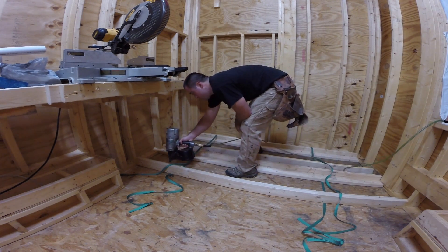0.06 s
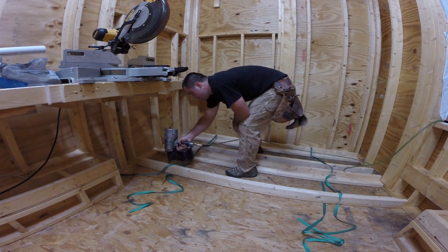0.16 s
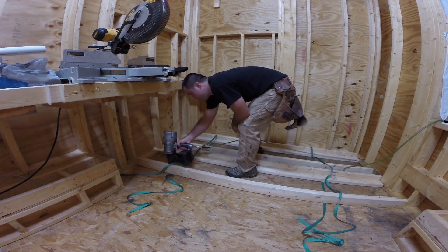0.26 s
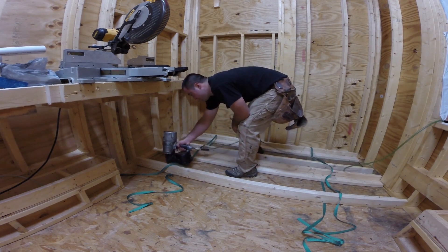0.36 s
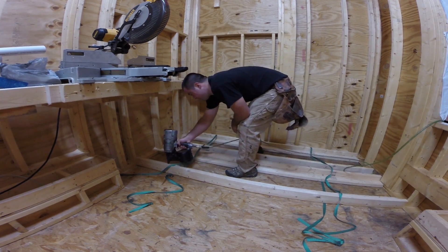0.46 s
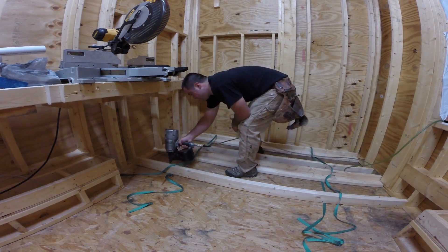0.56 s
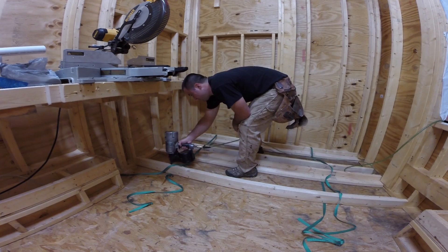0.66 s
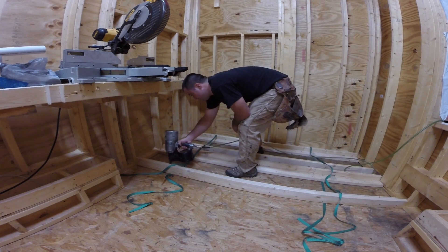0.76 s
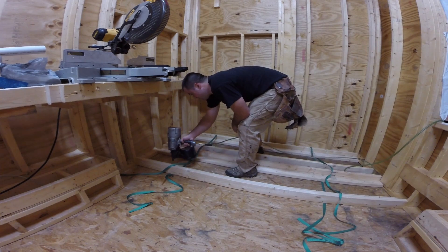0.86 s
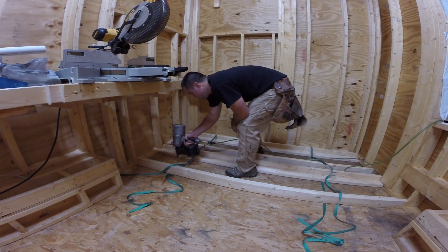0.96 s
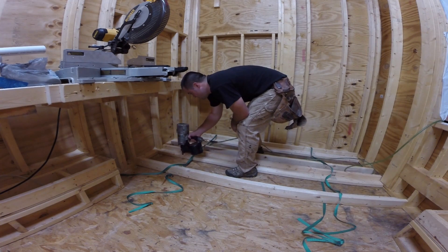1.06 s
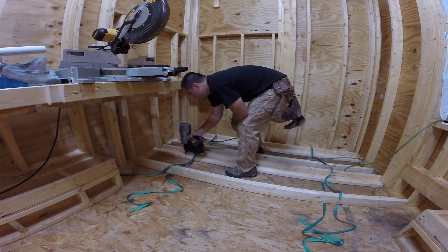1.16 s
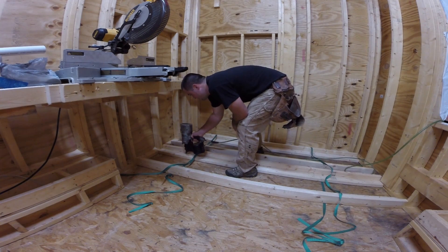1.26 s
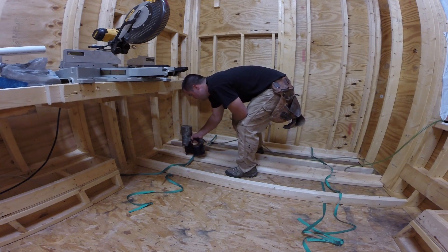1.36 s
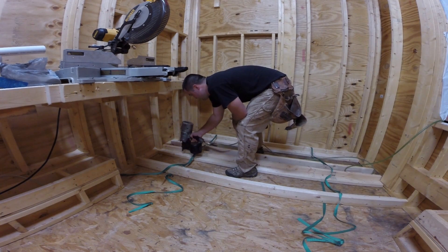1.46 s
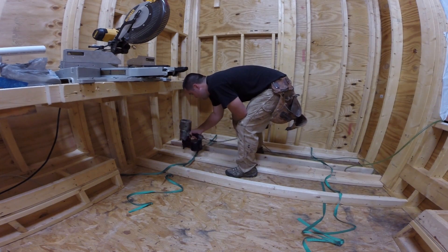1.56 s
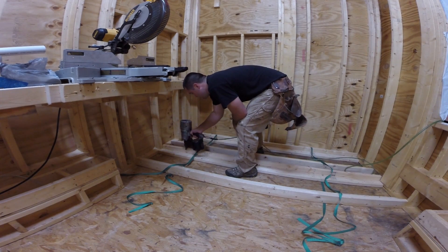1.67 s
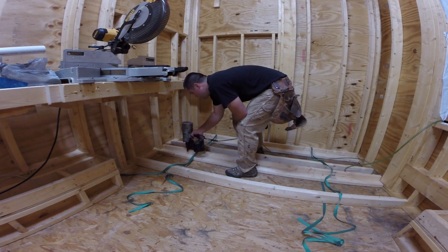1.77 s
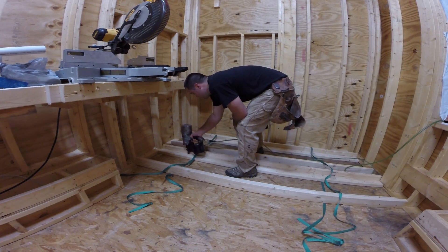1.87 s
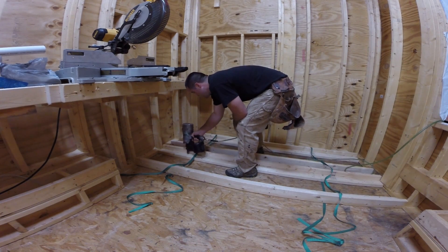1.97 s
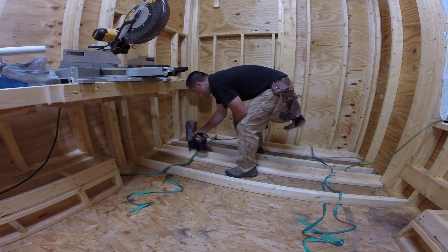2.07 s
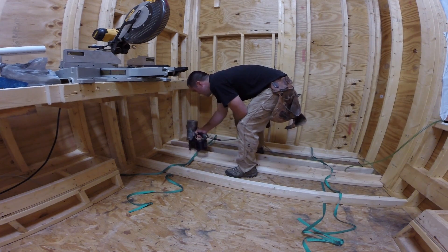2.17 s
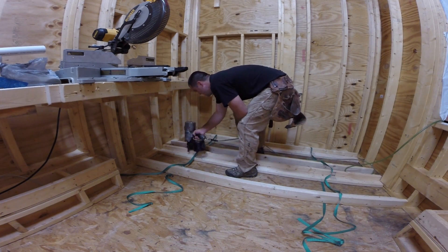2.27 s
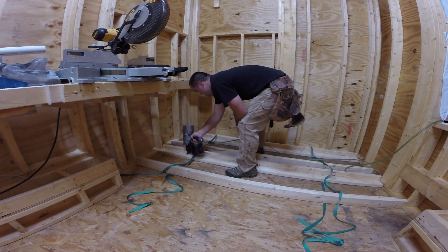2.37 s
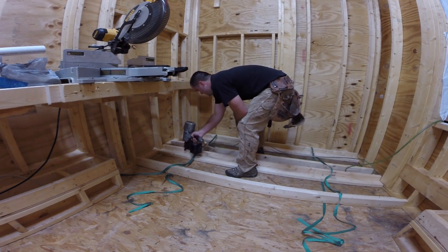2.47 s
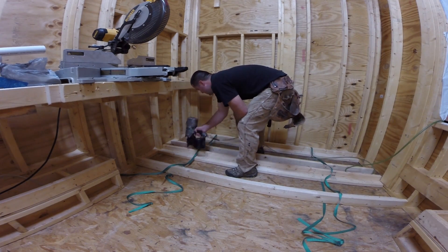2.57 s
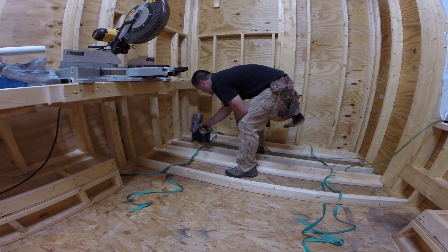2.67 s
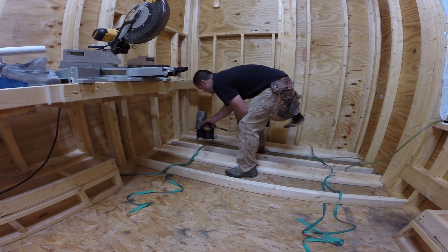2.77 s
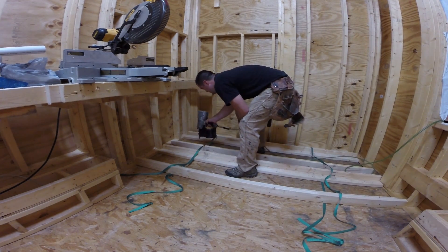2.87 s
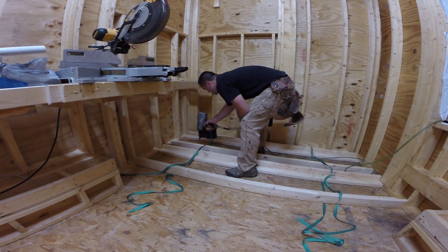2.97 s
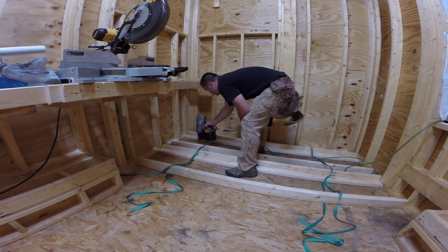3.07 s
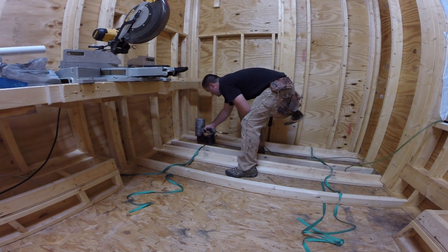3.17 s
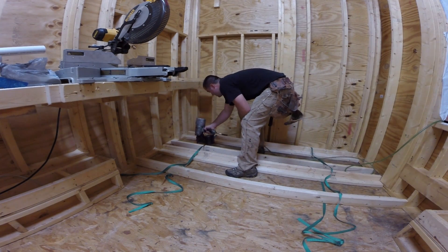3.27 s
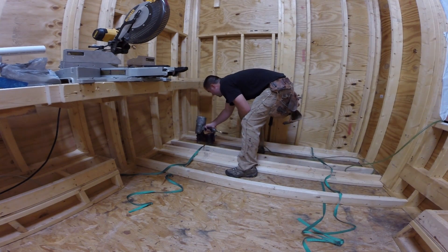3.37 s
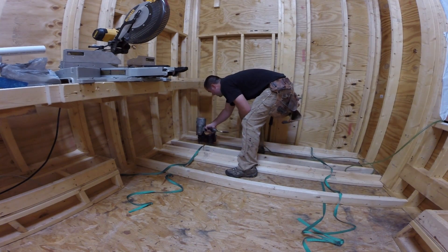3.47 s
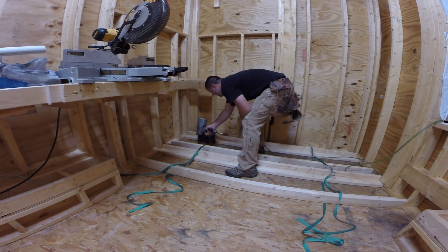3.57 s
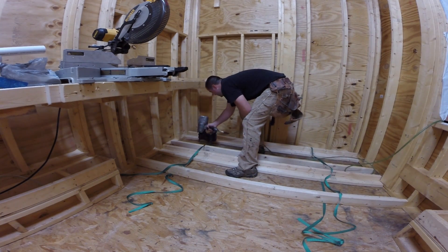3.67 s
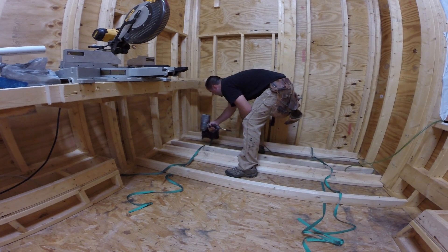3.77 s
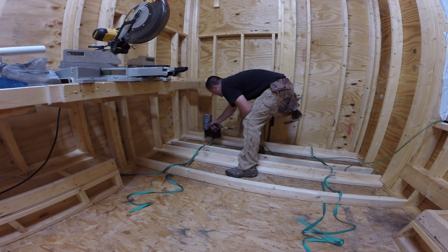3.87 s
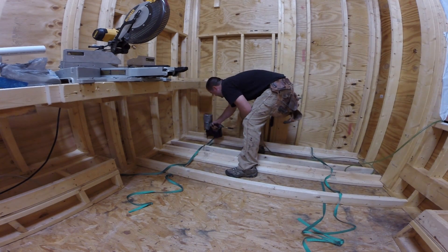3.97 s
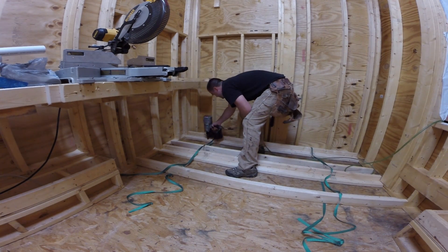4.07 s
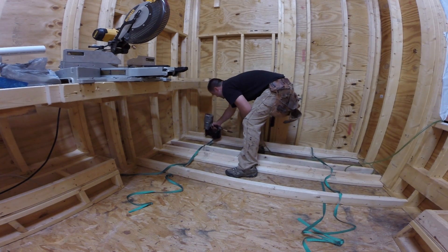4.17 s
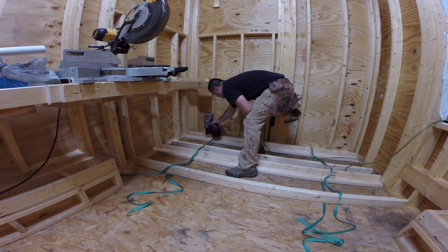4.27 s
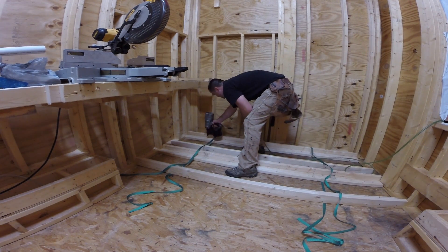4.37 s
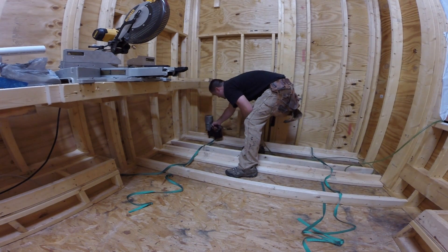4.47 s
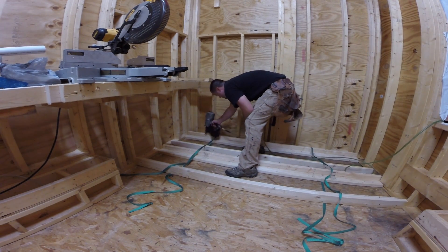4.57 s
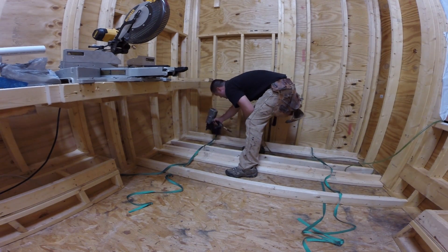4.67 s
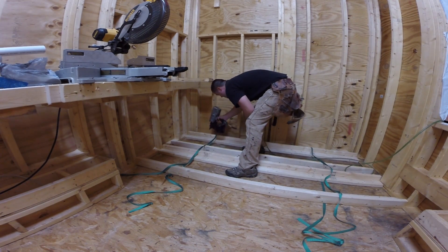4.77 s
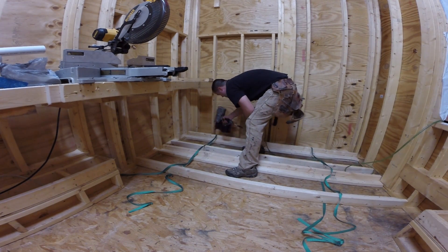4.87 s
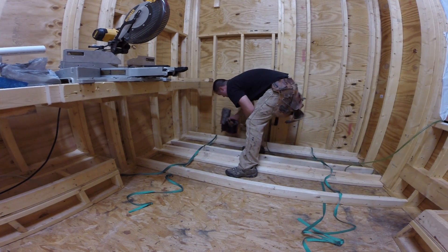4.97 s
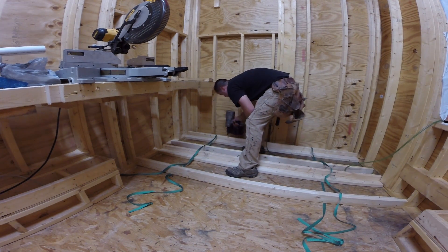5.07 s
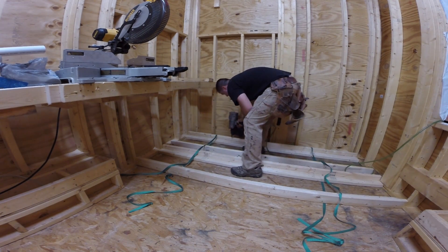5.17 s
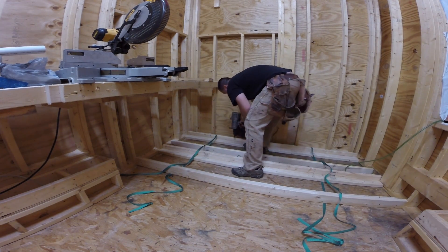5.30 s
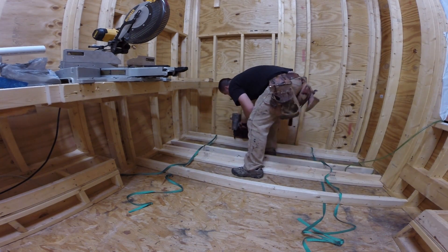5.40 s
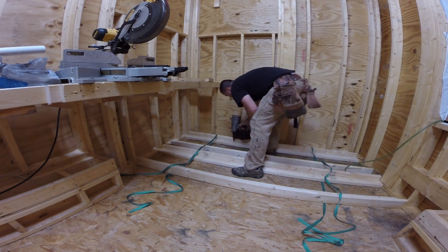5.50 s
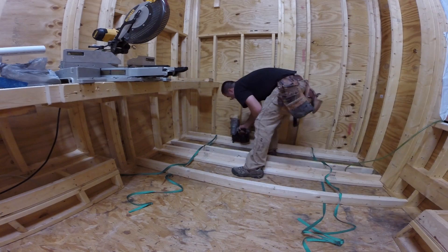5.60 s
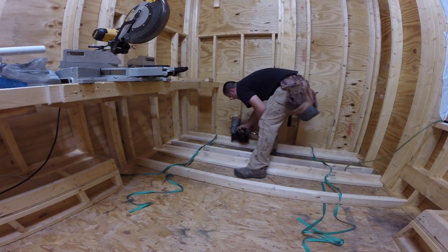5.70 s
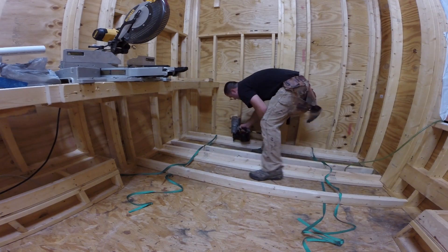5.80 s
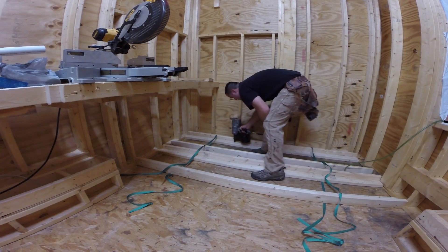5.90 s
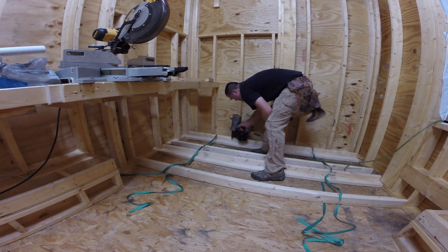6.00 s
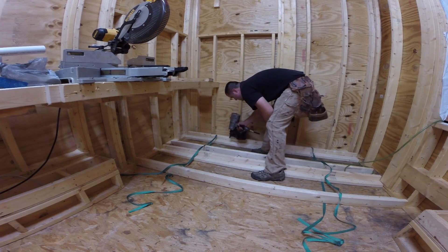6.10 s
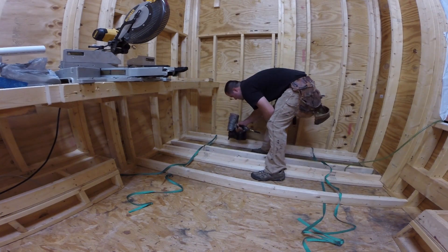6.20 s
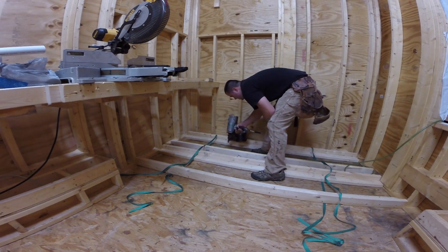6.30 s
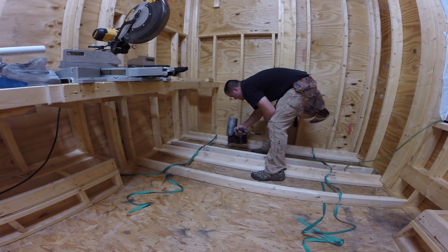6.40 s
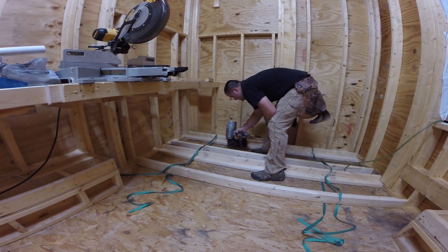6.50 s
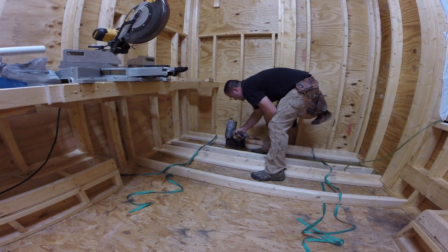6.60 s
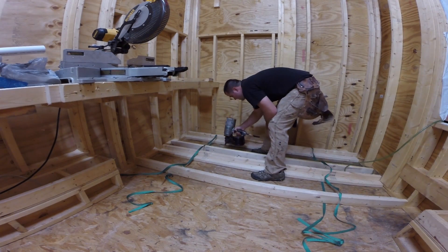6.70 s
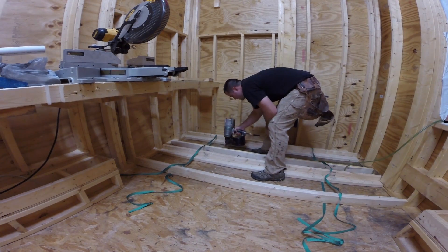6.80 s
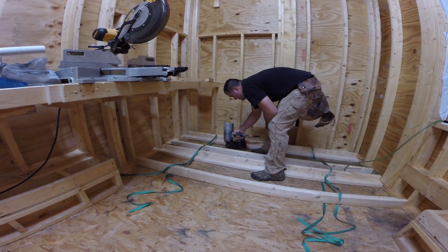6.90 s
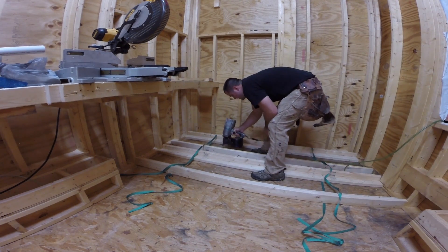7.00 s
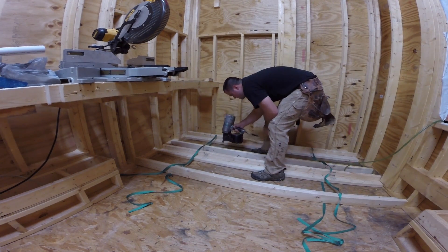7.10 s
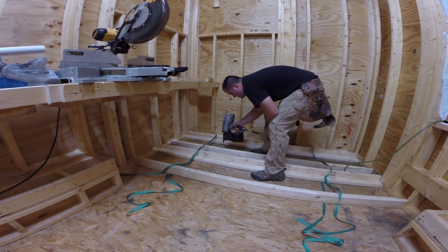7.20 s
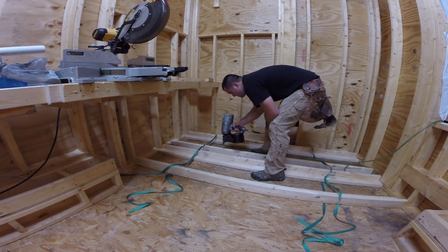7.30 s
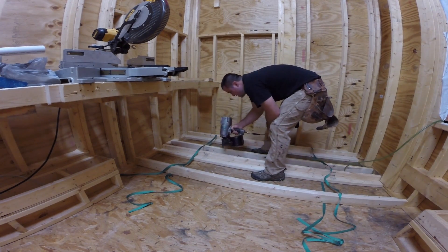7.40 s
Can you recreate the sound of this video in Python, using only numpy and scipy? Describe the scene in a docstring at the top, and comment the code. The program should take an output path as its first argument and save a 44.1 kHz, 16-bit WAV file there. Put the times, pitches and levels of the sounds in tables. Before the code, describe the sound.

A small bare plywood room, one microphone across it, faint low room noise. A rush of air dies away in the first 0.2 s, with a light bump at 0.14. A pneumatic nailer then fires at about 0.4 and 0.8, alone at 1.5 and 2.5, then in pairs at 3.3 and 3.6, 4.2 and 4.55, 5.7 and 6.0, 6.6 and 7.0. Each shot is a tick and swelling air, a loud woody slam, an exhaust puff, a piston knock some 0.06 s later, and a wavering hiss under half a second, while the floor booms low. Around 1.9-2.2 the gun clatters onto lumber with a deep thud and tiny nail clink; fainter bumps, a clink and a scuff come near 2.9. Soft bump and boot scuffs at 5.1-5.5. Later the hiss shortens and loses its whistle, the air turns brighter, and piston knocks soften.

```python
"""The floor of a small plywood room, heard by one microphone across the room: a pneumatic framing nailer drives
twelve nails, mostly in pairs, into a timber frame. Each shot: the trigger valve ticks, air fills the cylinder, the
driver slams the nail home, the exhaust puffs, the piston knocks back and the hose hisses as it refills the tool.
The floor booms as decaying sines, the gun bumps the lumber, a boot scuffs. The blows and puffs are shaped noise,
most of it passed through the room's decay; a limiter holds the peaks."""
import sys
import numpy as np
from scipy import signal
from scipy.fft import rfft, irfft, next_fast_len
from scipy.io import wavfile
from scipy.ndimage import uniform_filter1d, minimum_filter1d

SR = 44100
rng = np.random.default_rng(int(sys.argv[2]) if len(sys.argv) > 2 else 0)


def unload_wav(signal):
    """Save mono or channel-first audio to the path in sys.argv[1] as 16-bit WAV at rate SR, clipped to [-1, 1]."""
    wavfile.write(
        sys.argv[1],
        SR,
        np.round(np.clip(np.atleast_2d(signal).T, -1, 1) * 32767).astype(np.int16),
    )


N = 328545  # length in samples
T = np.arange(SR) / SR  # time within one event, s


# shots: t/s, trigger lead/s, tick level/dB, blow level/dB, board ring f/Hz, boom level/dB, piston return delay/s
# (tick, blow and boom levels are set per shot; the other parts have their own levels below)
SHOTS = [(0.399, 0.025, -37, -21.5, 1207, -33.5, 0.062), (0.778, 0.024, -27.5, -19, 752, -34, 0.068),
         (1.465, 0.027, -37.5, -20, 1284, -32, 0.059), (2.462, 0.026, -37, -19.5, 1298, -33.5, 0.062),
         (3.3, 0.025, -35.5, -20, 762, -37.5, 0.065), (3.609, 0.019, -34, -18.5, 740, -36, 0.061),
         (4.18, 0.027, -32, -20.5, 927, -35, 0.058), (4.554, 0.021, -38.5, -21.5, 606, -33.5, 0.051),
         (5.698, 0.025, -37, -21.5, 1256, -37.5, 0.06), (5.994, 0.02, -34, -24, 632, -35.5, 0.056),
         (6.634, 0.027, -34.5, -21, 846, -32.5, 0.058), (7.004, 0.02, -31, -27, 1397, -32.5, 0.061)]
# the worker swings the gun round along the frame: t/s, turn (0 side on, 1 exhaust port toward the microphone)
TURN = [(.4, 0.0098), (.78, -0.088), (1.46, 0.19), (2.46, 0.023), (3.3, -0.08), (4.18, 0.017), (4.55, 0.57),
        (5.7, .95), (7, 1.3)]


def nailer():
    """The firing cycle of each shot, from trigger to refill."""
    out = np.zeros(N)
    for s, lead, tick_db, blow_db, board_hz, boom_db, back in SHOTS:
        turn = np.interp(s, *np.transpose(TURN))
        beam = exhaust_beam(turn)
        trigger(out, s - lead, tick_db)
        fill(out, s, lead)
        drive_nail(out, s, blow_db, board_hz)
        thump(out, s, turn)
        floor_boom(out, s, boom_db)
        exhaust(out, s, turn, beam)
        piston_return(out, s, back)
        hose(out, s, turn, beam)
    return out


# spectrum of the trigger valve: f/Hz, level/dB per Hz
VALVE = [(30, -18.5), (200, -15), (600, -5), (950, -2.5), (1300, -6), (2100, -18.5), (3200, -17),
         (8000, -32.5), (15000, -42.5)]
# the gun's body under the trigger valve: f/Hz, width/Hz, lift/dB
VALVE_RING = [(980, 200, 6)]


def trigger(out, s, tick_db):
    """The trigger valve ticks: brief noise and a short ring of the gun's body."""
    tick = strike(0.0003, 0.0084)
    add(out, s, amp(tick_db) * in_room(noise(VALVE, SR, VALVE_RING), tick, direct=1.3))
    ring = strike(0.00064, 0.0045) * sine(rng.normal(980, 40))
    add(out, s, amp(tick_db + 3.5) * ring)


# spectrum of the air entering the cylinder: f/Hz, level/dB per Hz
FILL = [(40, -12.5), (400, -10), (720, -6), (980, -6), (1250, -14.5), (1900, -18), (2400, -12),
        (2900, -20.5), (5000, -25.5), (9000, -29.5), (15000, -45)]
# a trigger pulled faster than usual fills the cylinder harder
FILL_DB, USUAL_LEAD_S, FILL_DB_PER_S = -28, 0.026, 554


def fill(out, s, lead):
    """The head valve lets air into the cylinder, swelling toward the blow."""
    level_db = FILL_DB + FILL_DB_PER_S * (USUAL_LEAD_S - lead)
    air = noise(FILL, SR, ripple_db=5.0)
    add(out, s - 0.012, amp(level_db) * in_room(air, strike(0.0046, 0.011), direct=0.61, fade=0.65))


# spectrum of the nail blow: f/Hz, level/dB per Hz
BLOW = [(25, -23), (90, -13), (240, -17), (420, -5), (700, 0.5), (1000, 0), (1400, -1), (2200, -12.5),
        (3400, -15), (5000, -21), (9000, -29), (15000, -47.5)]
# resonances of the gun's housing and magazine: f/Hz, width/Hz, lift/dB (negative dips)
HOUSING = [(523, 72, 3), (825, 18, 3), (1344, 34, 2.5), (1840, 210, 1.5), (3164, 60, 3), (3430, 90, 3.5),
           (4370, 68, 7), (5020, 12, -2.5), (5589, 40, 1), (6300, 58, 4.5), (6800, 80, 4.5), (8100, 66, 1)]


def drive_nail(out, s, blow_db, board_hz):
    """The driver slams the nail into the board, a noise burst, and the board rings briefly."""
    wood = noise(BLOW, SR, HOUSING + [(board_hz, 100, 5)], ripple_db=2.5)
    slam = in_room(wood, strike(0.012, 0.011) ** 2, direct=0.76, fade=0.95)
    add(out, s - 0.003, amp(blow_db + 4.0) * slam)
    add(out, s + 0.002, amp(blow_db + 1.0) * strike(0.006, 0.008) * sine(board_hz))


# spectrum of the shaken frame: f/Hz, level/dB per Hz
THUMP = [(70, -13.5), (130, -1), (200, -3.5), (260, -3.5), (335, 0), (420, -4), (600, -21.5), (2000, -60.5)]
THUMP_DB, TURN_THUMP_DB = -28, 3  # gun side on; the frame thumps more where the worker ends up


def thump(out, s, turn):
    """The blow shakes the frame, a short low noise."""
    frame = noise(THUMP, SR, ripple_db=4.5)
    level_db = THUMP_DB + TURN_THUMP_DB * turn
    add(out, s, amp(level_db) * in_room(frame, strike(0.0031, 0.0089), direct=0.76))


# nominal modes of the plywood floor: f/Hz, level/dB, t60/s
FLOOR = [(44, -4.5, 0.93), (56.5, -10, 0.5), (65.13, -1.5, 0.84), (82.37, -3.5, 0.82), (109.4, -10, 0.85),
         (143.7, -7, 0.73), (152.7, -3, 0.61), (218.4, -0.5, 0.51), (330, 5.5, 0.3)]
# the joist under the gun rings lower once the work has moved on
NEAR_JOIST_HZ, FAR_JOIST_HZ, NEXT_JOIST_S = 79.16, 59.23, 4.37


def floor_boom(out, s, boom_db):
    """The floor's modes swell after a blow and decay as sines; the joist under the gun rings with them."""
    joist_hz = NEAR_JOIST_HZ if s < NEXT_JOIST_S else FAR_JOIST_HZ
    ring = np.zeros(SR)
    for hz, db, t60 in FLOOR + [(joist_hz, 2.5, 0.8)]:
        decay = amp(db + rng.normal(0, 1.5) - 60 * T / t60)
        cycles = hz * rng.normal(1, 0.011) * T + rng.random()
        ring += decay * np.sin(2 * np.pi * cycles)
    swell = 1 - np.exp(-(T / 0.036) ** 2)
    add(out, s, amp(boom_db + 4.5) * ring * swell)


# spectrum of the exhaust air: f/Hz, level/dB per Hz
EXHAUST = [(100, -11.5), (600, 4), (1350, -13.5), (2100, -3.5), (3300, 2), (4500, -3.5), (7000, -6),
           (9500, -9.5), (12500, -18), (15000, -33)]
EXHAUST_DB, TURN_EXHAUST_DB = -23.5, -4.5  # gun side on; a full turn shades the puff's body
SIDE_TREBLE_DB, TURN_TREBLE_DB = -0.6, 5.5  # a full turn beams the air's treble at the microphone


def exhaust_beam(turn):
    """Treble lift of the escaping air, one broad peak that grows as the port faces the microphone."""
    return [(11000, 8900, SIDE_TREBLE_DB + TURN_TREBLE_DB * turn)]


def exhaust(out, s, turn, beam):
    """Air leaks during the stroke, then the exhaust port opens and puffs."""
    leak = 0.26 * strike(0.004, 0.016)
    puff = np.exp(-((T - 0.033) / 0.011) ** 2)
    air = noise(EXHAUST, SR, HOUSING + beam, ripple_db=2.5)
    level_db = EXHAUST_DB + TURN_EXHAUST_DB * turn
    add(out, s, amp(level_db) * in_room(air, puff + leak, direct=0.52, fade=0.7))


# spectrum of the piston's knock: f/Hz, level/dB per Hz
RETURN = [(40, -12), (150, -6.5), (400, -8), (550, -1), (720, -0.5), (1000, -4.5), (1400, -7), (2000, -13),
          (3200, -18.5), (6000, -23.5), (15000, -47.5)]
# spectrum of metal on metal, also heard in the bumps: f/Hz, level/dB per Hz
CLACK = [(400, -27), (1200, -0.5), (3400, 2), (5000, -9), (9000, -17.5), (15000, -40)]
RETURN_DB, RETURN_SAG_DB_PER_S = -15, 1.12  # the air supply sags: the piston returns more softly
PISTON_CLACK_DB = -8.5  # steel on steel, against the piston's knock


def piston_return(out, s, back):
    """The piston knocks back against its stop: a knock, a clack and a short ring."""
    level_db = RETURN_DB - RETURN_SAG_DB_PER_S * s
    knock = noise(RETURN, SR, HOUSING, ripple_db=3.0)
    clack = amp(PISTON_CLACK_DB) * noise(CLACK, SR, HOUSING, ripple_db=3.0)
    add(out, s + back, amp(level_db) * in_room(knock + clack, strike(0.0036, 0.005), direct=2.56))
    ring = strike(0.003, 0.0056) * sine(rng.normal(550, 25))
    add(out, s + back + 0.002, amp(level_db + 2) * ring)


# spectrum of the hose's hiss: f/Hz, level/dB per Hz
HISS = [(500, -11.5), (2000, 2), (3500, -8.5), (5200, 1), (6300, -12.5), (7400, 0), (8400, 0), (9600, -4),
        (11600, -3), (13000, -11), (15000, -20.5)]
# spectrum of the hose's whistle: f/Hz, level/dB per Hz
WHISTLE = [(1500, -20.5), (2600, -10.5), (4100, -12), (4750, 0), (5050, -6), (5450, -3.5), (6400, -10.5),
           (7500, -13), (10000, -29)]
HISS_DB, WHISTLE_DB, TURN_WHISTLE_DB = -41, -37.5, -17  # gun side on; a full turn shades the whistle
REFILL_S, REFILL_SAG_PER_S = 0.4, 0.052  # at the start; the refill shortens by this share each second


def hose(out, s, turn, beam):
    """The hose refills the tool: the hiss wavers a little at random, weakens and stops; its resonances change."""
    refill = REFILL_S * (1 - REFILL_SAG_PER_S * s)
    opening = 1 - np.exp(-T / 0.0082)
    closing = 1 + np.exp(np.minimum((T - refill) / 0.019, 50))
    flow = opening * amp(-48 * T) / closing
    air = np.zeros(SR)
    position = np.minimum(3 * T / refill, 3)
    for stage in range(4):  # crossfade four random sets of resonances over the refill
        share = np.clip(1 - np.abs(position - stage), 0, 1)
        tones = [(hz, 300, 4.5) for hz in rng.uniform(3500, 13500, size=6)]
        hiss = amp(HISS_DB) * noise(HISS, SR, tones + beam)
        whistle = amp(WHISTLE_DB + TURN_WHISTLE_DB * turn) * noise(WHISTLE, SR, ripple_db=5.0)
        air += np.sqrt(share) * (hiss + whistle)
    waver = amp(3.3 * unit(uniform_filter1d(rng.standard_normal(SR), size=900)))
    add(out, s, in_room(air, waver * flow / flow.max(), direct=0.69))


# the gun's nose and body bump the lumber: t/s, ring level/dB, ring f/Hz, hardness (contact noise over ring)/dB
BUMPS = [(0.144, -45, 742, -23), (1.911, -33, 674, 0.5), (1.936, -37.5, 580, -2), (1.984, -41.5, 537, 0.5),
         (2.024, -39.5, 675, -7), (2.184, -48.5, 617, -7.5), (2.204, -46.5, 717, -6),
         (2.233, -58.5, 517, 7), (2.925, -54, 586, -5.5), (5.137, -55, 650, -14)]
# spectrum of the wooden knock: f/Hz, level/dB per Hz
BUMP = [(40, -17), (140, -8), (250, -15), (480, -5), (680, -1), (900, -8), (1150, -12), (1700, -17),
        (5000, -34), (15000, -60.5)]
BUMP_CLACK_DB = -5.5  # metal clack against the wooden knock


def bumps():
    """The gun is set down on the lumber: a wooden knock, a metal clack and a ring of the board."""
    out = np.zeros(N)
    for s, db, ring_hz, hard_db in BUMPS:
        knock = noise(BUMP, SR, ripple_db=3.5)
        clack = amp(BUMP_CLACK_DB) * noise(CLACK, SR, HOUSING, ripple_db=4.5)
        contact = in_room(knock + clack, strike(0.0036, 0.0066), direct=2.1)
        add(out, s - 0.002, amp(db + hard_db) * contact)
        add(out, s, amp(db) * strike(0.003, 0.014) * sine(ring_hz))
    return out


SETTLE_S, SETTLE_DB, SETTLE_HZ = 1.95, -36, 42.8


def settle():
    """The gun's weight settles on the floor with a thud, one low decaying sine."""
    out = np.zeros(N)
    add(out, SETTLE_S, amp(SETTLE_DB) * strike(0.067, 0.055) * sine(SETTLE_HZ))
    return out


# the nail strip clinks in its magazine: t/s, level/dB, ring f/Hz
CLINKS = [(2.16, -56.5, 3990), (2.895, -60.5, 3550)]


def clinks():
    """Nails clink together: a very short burst of bright noise with a broad resonance."""
    out = np.zeros(N)
    for s, db, ring_hz in CLINKS:
        spectrum = [(1500, -20.5), (4000, -1.0), (15000, -17.0)]  # f/Hz, level/dB per Hz
        steel = noise(spectrum, SR, [(ring_hz, 1400, 10)], ripple_db=4.5)
        add(out, s, amp(db) * in_room(steel, strike(0.00056, 0.006), direct=2.3))
    return out


# boot and clothes scuff over the boards: peak t/s, half length to 1/e/s, level before the grip varies it/dB, ring f/Hz
SCUFFS = [(2.953, .025, -62, 2500), (5.233, 0.084, -55.5, 1110), (5.446, .026, -52.5, 700),
          (5.48, 0.022, -49, 1900), (5.515, 0.049, -56.5, 218)]
# spectrum of a scuff: f/Hz, level/dB per Hz
SCUFF = [(40, -1), (130, -1.5), (400, -5.5), (1000, -4), (1500, -9.5), (3000, -20.5), (7000, -30.5),
         (15000, -45)]


def scuffs():
    """Soles catch and slip on the boards: noise with a randomly wavering level."""
    out = np.zeros(N)
    for s, half, db, ring_hz in SCUFFS:
        grip = amp(2.4 * unit(uniform_filter1d(rng.standard_normal(SR), size=300)))
        stroke = np.exp(-np.abs((T - 0.5) / half) ** 1.1)
        rub = noise(SCUFF, SR, [(ring_hz, ring_hz / 2, 6)], ripple_db=5.5)
        add(out, s - 0.5, amp(db) * stroke * grip * rub)
    return out


# a rush of air dies away at the start: t/s, level/dB
RUSH = [(0, -40.5), (.06, -50), (.13, -50.5), (.205, -53.5), (.218, -79.5)]


def opening_rush():
    """Air rushes at the start: broad noise that follows the falling level."""
    spectrum = [(30, 0.0), (200, -2.5), (750, -5.0), (1500, -12.0),
                (3000, -18.5), (8000, -25.0), (15000, -30)]  # f/Hz, level/dB per Hz
    level_db = np.interp(np.arange(N) / SR, *np.transpose(RUSH))
    return amp(level_db) * noise(spectrum, N, ripple_db=3.0)


# spectrum of the still room: f/Hz, level/dB per Hz
QUIET = [(20, 8.5), (45, 4.5), (110, -4.5), (300, -12.5), (600, -11.5), (1400, -21.5), (2500, -28.5),
         (4200, -26.5), (4750, -25), (5600, -30), (15000, -31)]


def still_room():
    """Steady room noise with two faint resonances."""
    return amp(-63.0) * noise(QUIET, N, [(1350, 130, 7.3), (4823, 60, 4)])


# decay of the small room, scaled by each sound's fade: f/Hz, t60/s
ROOM = [(60, 0.69), (200, 0.5), (550, 0.45), (1200, 0.52), (3000, 0.46), (6000, 0.5), (14000, 0.22)]


def in_room(carrier, drive, direct, fade=0.92):
    """Direct sound follows the drive; the room stores its energy and lets each band die away. Peak rms near 1."""
    hz, t, bands = signal.stft(carrier, SR, nperseg=256)
    power = np.add.reduceat(drive ** 2, np.arange(0, SR, 128))[None]  # one sum per STFT hop
    decay = amp(-60 * t / (fade * along(ROOM, hz)[:, None])) ** 2
    stored = signal.fftconvolve(power, decay / decay.sum(1).mean(), axes=1)
    stored = np.abs(stored)[:, :len(t)]
    level = np.sqrt(stored / stored.mean(0).max())
    wet = signal.istft(bands * level, SR, nperseg=256)[1][:SR]
    walls = 1 - np.exp(-T / 0.0054)  # the first reflections need a moment to arrive
    straight = direct * drive * carrier[::-1]  # reversed: unrelated in phase to the reflections
    return (wet * walls + straight) / np.sqrt(1 + direct ** 2 / 2)


def noise(spectrum, size, resonances=(), ripple_db=0):
    """Noise of rms 1 with the given spectrum, lifted at (f/Hz, width/Hz, lift/dB) resonances."""
    hz = np.fft.rfftfreq(size, 1 / SR)
    db = along(spectrum, hz)
    for centre, width, lift in resonances:
        db = db + lift * peak(hz, centre, width) ** 2
    # near walls comb the sound: a fresh random ripple for each call
    knots = np.cumsum(np.full(200, 0.045)) * np.linspace(600, 1800, 200)
    comb = np.interp(hz, knots, np.clip(rng.standard_normal(len(knots)), -2, 2))
    white = rfft(rng.standard_normal(size))
    return unit(irfft(white * amp(db + ripple_db * comb), size))


def peak(hz, centre_hz, width_hz):
    """Gain of one resonance, 1 at its centre."""
    return 1 / np.sqrt(1 + (2 * (hz - centre_hz) / width_hz) ** 2)


def strike(rise, life):
    """Envelope of a contact with peak 1: fast rise, exponential fall (time constants in s)."""
    shape = (1 - np.exp(-T / rise)) * np.exp(-T / life)
    return shape / shape.max()


def sine(hz):
    """Steady sine over one event."""
    return np.sin(2 * np.pi * hz * T)


def along(points, hz):
    """Read (f/Hz, value) points on a log frequency axis."""
    f, v = np.transpose(points)
    return np.interp(np.log(hz + 1), np.log(f + 1), v)


def amp(db):
    """Decibels to gain."""
    return 10 ** (np.asarray(db) / 20)


def unit(x):
    """Scale to rms 1."""
    return x / np.sqrt(np.mean(x ** 2) + 1e-20)


def add(track, s, sound):
    """Mix a sound into the track at time s."""
    start = max(round(s * SR), 0)
    track[start:start + len(sound)] += sound[:max(len(track) - start, 0)]


def scene():
    """Everything heard from across the room, on one channel."""
    gun = nailer() + bumps() + settle() + clinks()
    surroundings = scuffs() + opening_rush() + still_room()
    return (gun + surroundings)[None]


LIMIT_DB, TOP_HZ = -9, 15300  # limiter ceiling; band limit of the microphone channel


def record(dry):
    """The microphone channel's limiter turns the loudest moments down; nothing passes above its band limit."""
    needed = np.minimum(1, amp(LIMIT_DB) / (np.abs(dry) + 1e-9))
    gain = uniform_filter1d(minimum_filter1d(needed, size=200), size=200)
    size = next_fast_len(N + SR // 4)
    passband = np.fft.rfftfreq(size, 1 / SR) < TOP_HZ
    return irfft(rfft(dry * gain, size) * passband, size)[:, :N]


dry = scene()
out = record(dry)
unload_wav(out)
```